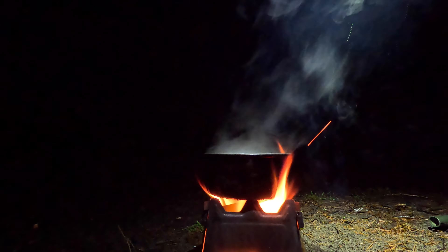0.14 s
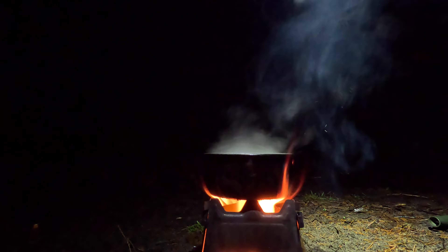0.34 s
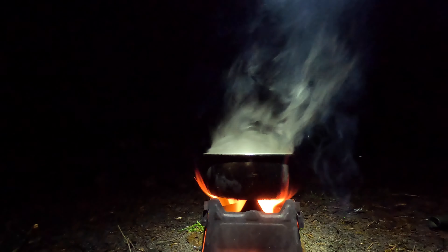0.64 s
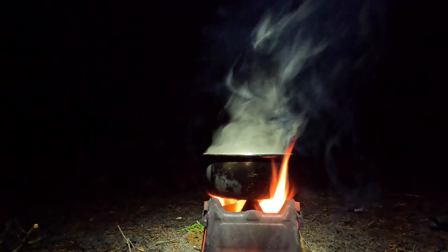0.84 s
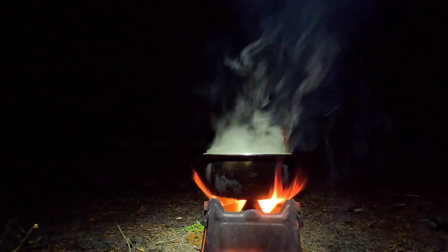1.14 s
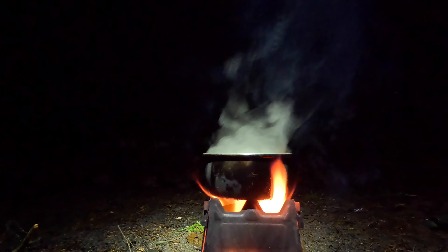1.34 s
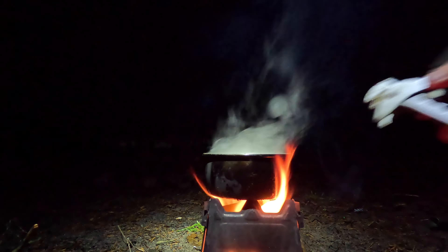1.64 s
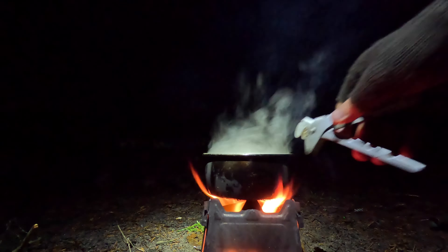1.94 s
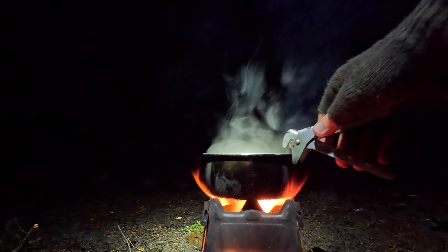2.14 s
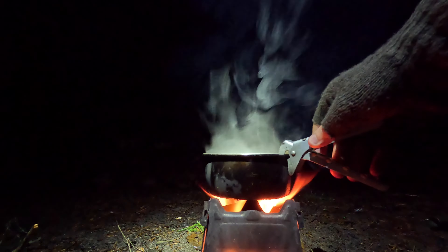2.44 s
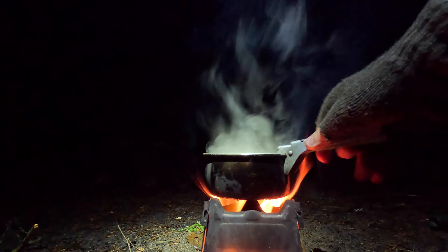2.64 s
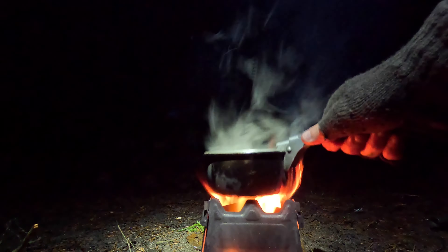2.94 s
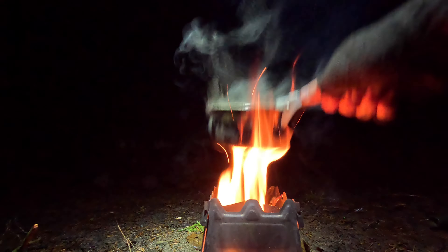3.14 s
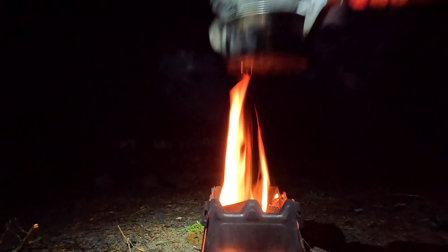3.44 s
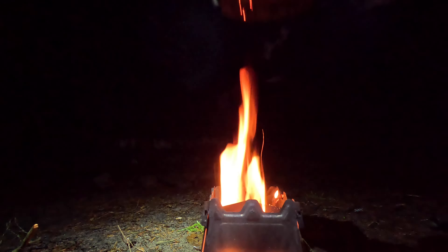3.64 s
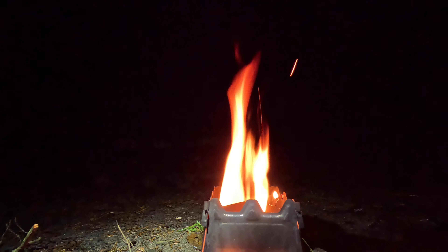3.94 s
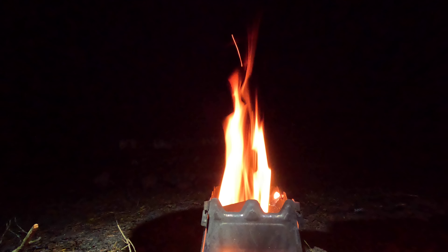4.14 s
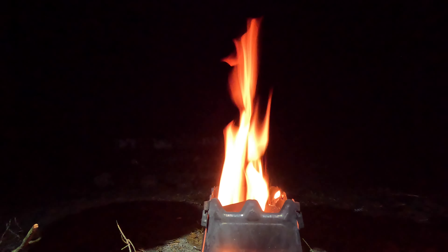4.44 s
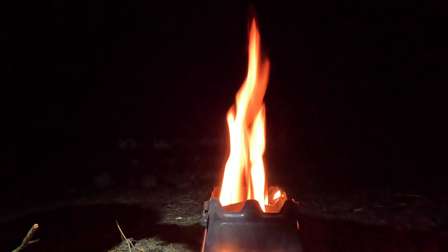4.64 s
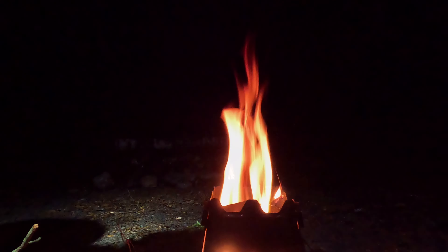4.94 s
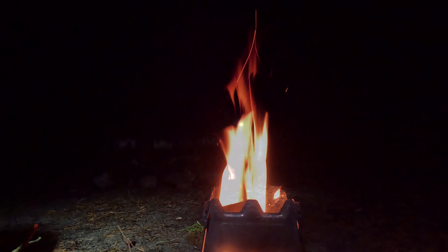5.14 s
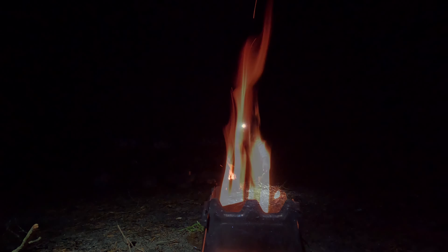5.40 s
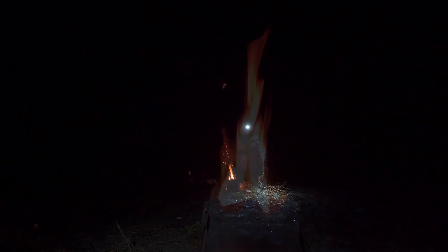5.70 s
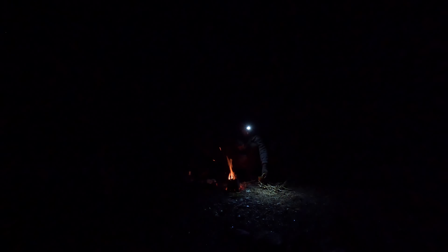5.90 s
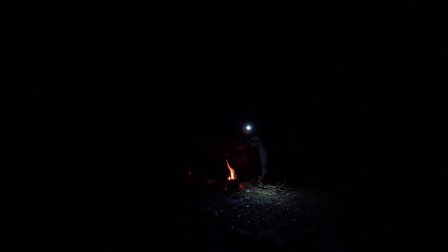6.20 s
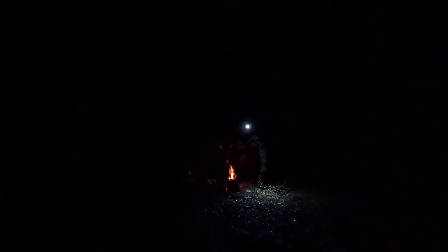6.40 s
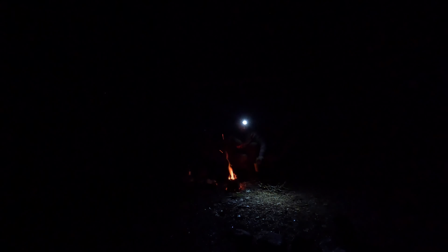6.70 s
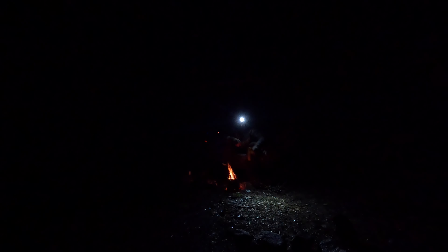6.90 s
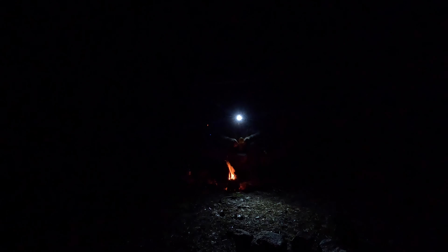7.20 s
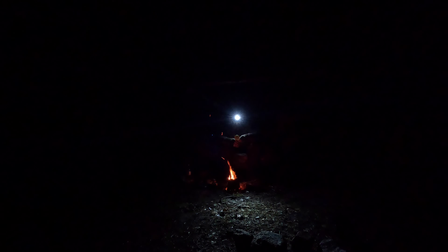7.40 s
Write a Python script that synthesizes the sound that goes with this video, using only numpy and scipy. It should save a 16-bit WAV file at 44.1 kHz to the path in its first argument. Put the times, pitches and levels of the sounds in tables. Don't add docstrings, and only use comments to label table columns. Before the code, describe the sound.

Close beside a small wood fire under a tarp, a light pot scrapes, rings briefly and lands with a dull clunk. Single drops tick and thump the sheet at irregular intervals. A hard bright clank and a dry metal snap follow as a gripper takes the pot, then small crackles thicken around the flame. The last part is the same drizzle and fire heard from farther off, quieter and less bright.

```python
import sys
import numpy as np
from scipy import signal
from scipy.io import wavfile
from scipy.ndimage import uniform_filter1d

SR = 44100
rng = np.random.default_rng(int(sys.argv[2]) if len(sys.argv) > 2 else 0)


def file_out(sig):
    cols = np.atleast_2d(sig).T
    lim = np.clip(cols, -1, 1)
    pcm = np.round(lim * 32767).astype(np.int16)
    wavfile.write(sys.argv[1], SR, pcm)


def field_ratio(decibels):
    return 10 ** (np.asarray(decibels, dtype=float) / 20)


N = 333376
T = np.arange(N) / SR

LIFT_S, AWAY_S = (2.39, 3.68), (5.06, 5.59)
LIFTED, AWAY = np.interp(T, LIFT_S, [0, 1]), np.interp(T, AWAY_S, [0, 1])

POT_HZ = [666, 1168, 1340, 1978, 2584, 2692, 2918, 3556, 4000, 4432, 5339, 5556, 6056, 6708]
# (level [dB], t60 [s])
POT_FREE = [(-9, .53), (-8, .65), (-14, .41), (-25, .47), (-9, .46), (-19, .24), (-14, .26), (-3, .19),
            (-13, .09), (-14, .2), (-13, .15), (-16, .13), (-13, .094), (-22, .11)]
# (mode [Hz], level [dB], t60 [s])
POT_DOWN = [(668, 0, .12), (1163, -19, .25), (1809, -24, .45), (1981, -19, .5), (2584, -24, .47),
            (2961, -17, .41), (4436, -27, .29), (5329, -32, .4)]
# (mode [Hz], level [dB], t60 [s])
EDGE = [(1380, 0.5, 0.1), (2500, -15, 0.044), (2900, -17, 0.043), (3590, 4, 0.03), (4580, 0, 0.062),
        (5000, -27, .03), (5600, -0.5, 0.025), (6050, -7, 0.025)]
# (hardest at [s], grating [dB], swell [dB/s], fade [dB/s])
STROKES = [
    (.292, -56, 3200, 138),
    (0.331, -51, 228, 1296),
    (0.43, -37, 780, 900),
    (0.472, -30.5, 903, 800),
    (.49, -50, 304, 900),
]
# (time [s], level [dB], hard contact share [0-1])
CATCHES = [
    (.288, -43.5, 0.54),
    (.303, -39, 0),
    (.327, -51, .9),
    (.411, -40.5, 0.1),
    (.427, -53, 0.5),
    (.44, -31, 0.26),
    (.452, -35, 0.15),
    (.464, -48, 1),
    (.482, -47, 1),
]
# (time [s], level [dB])
SET_DOWN = [
    (.575, -29.5),
    (.62, -47),
    (.66, -56),
    (.715, -67),
]
LET_GO = [(.469, -33)]
GRATING_T60_S, CAUGHT_S, SETTLED_S = 0.26, .572, 0.665
DENT_RATIO, DENT_DB = 1.008, -11

# (mode [Hz], level [dB], t60 [s])
RIM = [(320, -8, .12), (678, -21, .25), (1055, -13, .14), (1233, 0, .072), (2216, -3, .15),
       (2654, -23, .19), (3185, -6, .15), (4064, -7, .13), (4511, -20, .13), (4867, -20, .2),
       (5010, 4, .022), (5604, -19, .22), (6342, -11, .08), (7106, -26, .13)]
# (mode [Hz], level [dB], t60 [s])
RIM_LIGHT = [(349, -6.5, 0.19), (1600, 6, .04), (2130, -5, 0.17), (3180, 5, 0.058), (4064, -10, .12),
             (4480, 1, .025), (5600, -7, 0.16)]
# (mode [Hz], level [dB], t60 [s])
JAWS_OPEN = [(1530, 4, 0.018), (3220, 0, 0.026), (4200, -7, 0.017), (5670, -4, .05)]
# (mode [Hz], level [dB], t60 [s])
JAWS_SHUT = [(386, -17.5, 0.16), (1700, -24, 0.037), (2467, -1.5, 0.031), (3350, 1, 0.027),
             (4210, 4.5, 0.023), (4950, -1.5, 0.049), (5750, -8, 0.061), (6600, -29, 0.022)]
# (time [s], level [dB])
RIM_HITS = [(2.326, -30), (2.333, -52), (2.342, -69), (2.355, -66), (2.37, -73)]
LIGHT_HITS = [(2.461, -44.5), (2.475, -56)]
# (time [s], level [dB])
BRUSHES = [
    (2.672, -43),
    (2.676, -51),
    (2.681, -60),
]
# (time [s], level [dB])
JAW_HITS = [
    (2.695, -40.5),
    (2.6962, -25.5),
    (2.705, -41.5),
]
# (time [s], peak [dB], centre [Hz], t60 [s])
CLICKS = [(0.2867, -40, 2410, 0.04), (0.3078, -31, 4400, 0.043), (0.427, -45, 3620, 0.026),
          (0.4638, -16.5, 3650, 0.044), (0.5735, -38, 2940, 0.015), (2.3259, -10, 6450, 0.012),
          (2.4612, -35, 4480, 0.011), (2.672, -42, 3230, 0.02), (2.6949, -19.5, 4200, 0.024),
          (.435, -35, 5200, .02), (.483, -35, 4800, .02)]
# (time [s], peak [dB], centre [Hz], t60 [s])
KNOCKS = [(.289, -34.5, 1180, 0.039), (0.327, -33.5, 1120, 0.095), (0.426, -36, 1210, 0.024),
          (.45, -37, 1240, 0.024), (.575, -28, 660, 0.028), (0.611, -39.5, 814, 0.15),
          (2.3255, -19, 1460, 0.043), (2.459, -39.5, 1470, 0.11), (2.696, -31, 1700, 0.039),
          (.001, -42, 645, 0.12), (.66, -39, 1250, 0.095)]
POT_LEAN_DB, GRIPPER_LEAN_DB = -3, -6

# (time [s], peak [dB], centre [Hz], L-R [dB])
TICKS = [(.3546, -9.5, 6400, -5), (1.915, -29.5, 7300, -5.5), (2.209, -34, 5400, 1),
         (2.2338, -12.5, 6600, -4), (2.3144, -20.5, 5600, -2), (2.8536, -25.5, 6450, 2),
         (2.9653, -11.5, 6230, 1), (3.0688, -29, 9100, -3), (3.356, -28.5, 6850, -2.5),
         (3.7329, -42, 7150, 5), (3.8016, -43, 7710, 4), (3.8856, -36.5, 7200, -2),
         (4.1737, -31.5, 8300, 3), (4.3883, -10, 8330, 3), (4.581, -32.5, 7400, -2.5),
         (4.9746, -34, 7040, 10)]
# (time [s], peak [dB], centre [Hz], L-R [dB])
TAPS = [(.0647, -38, 2890, -11), (.0817, -17, 7550, 2), (.7459, -32, 3740, -7), (1.506, -16.5, 3850, 4),
        (2.0073, -24, 2870, 5), (2.0586, -36, 2550, -1), (2.0908, -37.5, 3760, -3), (2.2906, -28, 3130, 5),
        (2.4335, -33.5, 5500, 2), (2.778, -40, 4140, 13), (3.1826, -32.5, 3300, 6),
        (3.312, -34.5, 3040, -3), (3.3278, -33.5, 2980, 3), (3.8492, -38.5, 2900, 3),
        (4.5487, -39, 3820, 2), (5.1447, -39, 3000, 10), (5.2697, -36.5, 3970, 0)]
# (time [s], peak [dB], centre [Hz], t60 [s], L-R [dB])
FAR_DROPS = [(5.4158, -40, 2620, 0.0069, -6), (5.452, -37, 6800, 0.085, 4), (5.572, -30.5, 8700, 0.014, -3),
             (5.614, -35.5, 6740, 0.033, -2), (5.707, -28, 3180, 0.0068, -3),
             (6.035, -35.5, 7700, 0.029, -4), (6.199, -48, 9600, 0.048, 17), (6.2243, -26, 8400, 0.02, 0.5),
             (6.2503, -38, 3500, 0.017, -5), (6.2966, -40, 8500, 0.05, 1), (6.497, -35, 5800, 0.016, -3),
             (6.738, -21, 6140, 0.021, 1), (7.2753, -39.5, 8200, 0.095, -3)]
# (time [s], peak [dB], centre [Hz])
FAINT = [(1.418, -38, 3180), (3.4042, -42, 6000), (4.3337, -41, 6900), (5.021, -41.5, 3900),
         (5.3226, -42, 4670), (5.893, -41.5, 7000), (6.96, -43.5, 5400), (1.993, -42, 2500)]
# (time [s], peak [dB], centre [Hz], t60 [s])
SLAPS = [(.082, -40, 1600, 0.016), (0.093, -41.5, 680, 0.072), (0.205, -40.5, 1490, 0.066),
         (.355, -26.5, 685, 0.012), (1.5056, -17.5, 1150, 0.029), (2.0075, -23.5, 1180, 0.039),
         (2.234, -27.5, 2180, 0.018), (2.2562, -28, 1350, 0.059), (2.291, -21.5, 1000, 0.027),
         (2.619, -42, 1900, 0.046), (2.776, -35.5, 1150, 0.038), (2.9655, -25, 2150, 0.0046),
         (3.184, -20.5, 1220, 0.022), (3.328, -40.5, 1140, 0.018), (3.662, -33.5, 2180, 0.014),
         (3.794, -39, 1160, 0.027), (5.416, -28, 1430, 0.018), (5.596, -33.5, 960, 0.044),
         (5.706, -35.5, 1660, 0.014), (6.035, -38, 1210, 0.034), (6.223, -32.5, 1290, 0.018),
         (6.25, -38, 1400, 0.065), (6.497, -33.5, 790, 0.042), (6.642, -36, 810, 0.026),
         (6.739, -32, 720, 0.033), (6.7525, -35.5, 1040, 0.064), (6.912, -43, 1200, 0.073)]
# (time [s], peak [dB], centre [Hz], L-R [dB])
PATS = [(3.432, -53, 1990, -0.5), (3.54, -50, 1130, 0.0), (3.609, -46, 2100, 1), (3.755, -45, 1170, -1),
        (3.923, -48, 1310, 3), (3.956, -47, 1390, 3), (4.029, -45.5, 1120, 2), (4.061, -49, 2120, -0.5),
        (4.111, -50, 1310, 2), (4.14, -57, 1280, 8), (4.333, -47.5, 990, 1), (4.388, -27.5, 2750, -4.5),
        (4.488, -51, 1110, 12), (4.546, -42.5, 1990, 11), (4.578, -51, 1330, 14), (4.634, -45, 1960, 13),
        (4.741, -53, 1570, 17), (4.969, -40, 3230, 3.0), (4.987, -44, 1320, 2), (5.021, -57, 1150, 8),
        (5.047, -47, 1270, 7), (5.085, -46, 2280, 2.0), (5.123, -48, 2300, 13), (5.143, -45, 1390, 1),
        (5.434, -50, 1100, 0.0), (5.466, -48, 1310, -2), (5.744, -57, 1380, 0.0), (5.859, -54.5, 1010, -1),
        (5.89, -49.5, 2590, 1.5), (5.973, -64, 1050, -2), (6.144, -54, 977, -5), (6.2, -55, 1350, 4),
        (6.297, -51.5, 1330, 5), (6.352, -54, 1300, 0), (6.595, -49, 1080, -2), (6.953, -50, 1220, 0.5),
        (7.026, -48.5, 1300, -1), (7.058, -56.5, 1230, -7), (7.273, -48.5, 1400, 2),
        (7.406, -55, 1710, 0.5)]
# (time [s], peak [dB], centre [Hz], t60 [s])
SPLATS = [(2.404, -53, 5000, .01), (5.5958, -37, 2260, 0.022), (5.6016, -36.5, 1880, .035),
          (5.821, -58, 4530, 0.009), (5.975, -52, 6950, .015), (6.228, -33.5, 3050, 0.039),
          (6.2499, -35, 3130, .03), (6.267, -49, 3200, .015), (6.4971, -36, 3000, 0.016),
          (6.504, -49, 2970, 0.013), (6.542, -49, 5900, .02), (6.9113, -38.5, 2700, 0.024),
          (6.917, -43, 1400, 0.036), (5.327, -46.5, 3600, .015), (5.358, -47, 1300, .012),
          (5.5748, -41.5, 7000, .02), (5.7052, -54, 8100, 0.0045), (6.7525, -38, 2500, .05)]
# (time [s], peak [dB], swing [Hz])
THUDS = [(.001, -46.5, 616), (.093, -44.5, 420), (0.136, -46, 400), (0.223, -44.5, 195), (2.221, -41, 200),
         (0.326, -40.5, 148), (0.611, -33.5, 442), (0.654, -42.5, 168), (1.157, -41.5, 88.5),
         (1.505, -24, 274), (1.631, -40.5, 59.5), (2.009, -30, 297), (2.249, -35, 298), (2.2578, -28, 260),
         (2.266, -38, 248), (2.291, -33.5, 335), (2.328, -39, 306), (2.462, -40.5, 370),
         (2.775, -31.5, 195), (3.1839, -26, 275), (3.462, -37.5, 128), (5.271, -39.5, 73.5),
         (5.277, -31, 223), (5.417, -41.5, 300), (5.708, -43.5, 317), (6.7383, -32, 342),
         (2.788, -32.5, 342), (2.83, -51, 330), (6.502, -44.5, 144), (6.759, -41.5, 302)]
# (time [s], delay [ms], low-mid hollowness [0-1])
BOUNCES = [(.082, .235, 0), (.746, .78, 0), (1.506, 1.0, .9), (1.915, .14, 0), (2.007, .66, .8),
           (2.234, .28, 0), (2.257, .8, .5), (2.291, .94, .15), (2.326, .46, 0), (2.696, 1.2, 1),
           (2.854, .33, 0), (2.966, .27, 0), (3.183, 1.04, .7), (3.356, .32, 0), (3.662, .96, .8),
           (4.388, .12, 0), (5.416, .8, .9), (5.707, .84, 0), (6.034, .2, 0), (6.224, .42, 0)]
TICK_CYCLES, TAP_CYCLES, PAT_CYCLES = 35, 18, 23
LONGER_PER_DB = 0.23
SLAP_LEAN = 0.3
BOUNCE_SHARE, BOUNCE_SHARP_DB = .62, 5
DRIP_S, DRIP_DB, DRIP_HZ, DRIP_FALL_PER_S, DRIP_T60_S = 0.19, -44, 1400, 28, 0.065

# (frequency [Hz], density [dB/Hz])
FLUTTER_NEAR = [(12, -35), (20, -5.5), (64, 2), (107, -12), (151, 5), (219, -1.5), (282, -0.5),
                (435, -10.5), (700, -37), (910, -51), (1540, -120)]
# (frequency [Hz], density [dB/Hz])
FLUTTER_FAR = [(12, -38), (20, -2), (86, -9), (117, -28), (151, 3.5), (204, 0.5), (229, -8), (266, -22),
               (282, -14), (560, -24), (700, -41), (910, -62), (1540, -120)]
# (frequency [Hz], density [dB/Hz])
SIMMER = [(500, -14), (631, -5), (1180, 9), (1690, 1), (2190, 10.5), (2850, 0), (3600, 4), (4940, -6.5),
          (5550, 4), (6400, -2.5), (7500, 0.5), (8200, -3), (9400, 2.5), (10500, -14), (14500, -13)]
# (frequency [Hz], density [dB/Hz])
FLAME = [(500, -6), (668, -15), (1230, 3), (1690, -3), (2230, -1), (5700, -8.5), (9500, -9), (10500, -17.5),
         (14500, -25.5)]
# (frequency [Hz], density [dB/Hz])
FOREST = [(500, 7), (795, -10), (1280, -1.5), (2850, -8), (4150, -11.5), (7500, -14), (9600, -15),
          (10500, -29), (14500, -33)]
# (frequency [Hz], left-right likeness [0-1])
LIKENESS = [(60, 1), (100, 0.96), (180, 0.97), (310, 0.61), (550, 0.88), (950, 0.88), (1650, 0.82),
            (2860, 0.59), (4970, 0.91), (8640, 1), (15000, 0.12)]
# (frequency [Hz], left-right likeness [0-1])
LIKENESS_FAR = [(60, 1), (150, 0.27), (380, 0.65), (950, 0.62), (2380, 0.35), (5980, 0.91), (15000, 0.96)]
# (frequency [Hz], L-R [dB])
LEAN_FAR = [(60, -1.5), (180, -7.5), (550, -2.5), (1650, 1.5), (4970, -0.5), (15000, 5.5)]
# (time [s], level [dB])
VIGOUR = [(0, 1), (.31, 2), (.6, 1), (1.01, 1.5), (1.96, 1.5), (2.23, 2.5), (2.95, 3.5), (3.26, 0.5),
          (3.64, 1), (4.19, -2.5), (4.42, -1.5), (4.74, 2), (5.07, 0), (5.73, -1), (6.5, -3), (6.69, 0),
          (7.07, -1), (7.56, -1)]
# (time [s], width [s], level [dB])
SWELLS = [
    (4.88, 0.08, 4),
    (5.21, 0.067, 6),
]
# (pot on [dB], pot lifted [dB], from afar [dB], share of vigour followed [ratio])
FLUTTER, HISS, DRIZZLE = (-68.5, -62.5, -65.5, 0.92), (-64.5, -64, -71, 1.4), (-68, -67, -74.5, 0.6)
CALM_FAR = 0.74


def rms_one(x):
    return x / np.sqrt(np.mean(x ** 2) + 1e-20)


def at_hz(points, hz):
    points_hz, values = np.transpose(points)
    return np.interp(np.log(hz), np.log(points_hz), values)


def band(x, low_hz, high_hz):
    sos = signal.butter(2, [low_hz, min(high_hz, .45 * SR)], "band", fs=SR, output="sos")
    return signal.sosfilt(sos, x)


def low_pass(x, order, cutoff_hz):
    return signal.sosfilt(signal.butter(order, cutoff_hz, fs=SR, output="sos"), x)


def add(out, s, sound):
    i = round(s * SR)
    out[:, i:i + sound.shape[1]] += sound[:, :N - i]


def blows(hits):
    clicks = np.zeros(N)
    clicks[[round(s * SR) for s, db in hits]] = field_ratio(np.array(hits)[:, 1])
    return clicks


def struck(clicks, modes):
    first, last = np.flatnonzero(clicks)[[0, -1]]
    ringing = slice(first, last + SR // 2)
    force, out = clicks[ringing] + 1e-18, np.zeros(N)
    for hz, level_db, t60_s in modes:
        r, w = field_ratio(-60 / (t60_s * SR)), 2 * np.pi * hz / SR
        out[ringing] += field_ratio(level_db) * signal.lfilter([0, np.sin(w)], [1, -2 * r * np.cos(w), r * r], force)
    return out


def pot():
    pressure_db = np.max([db - np.maximum(swell * (s - T), fade * (T - s))
                          for s, db, swell, fade in STROKES], axis=0)
    grit = field_ratio(1.7 * np.minimum(rng.exponential(1, N), 4)) * rng.choice([-1, 1], N)
    grit *= rng.random(N) < 1500 / SR
    grit *= field_ratio(pressure_db) * (pressure_db > -90)

    hard = blows([(s, db + 20 * np.log10(np.clip(share, .01, 1))) for s, db, share in CATCHES])
    soft = band(blows([row[:2] for row in CATCHES]), 500, 1200)
    damped = [(hz, db, min(t60_s, GRATING_T60_S)) for hz, (db, t60_s) in zip(POT_HZ, POT_FREE)]
    rubbing = struck(field_ratio(-24.0) * grit + hard + soft, damped)
    scrape = field_ratio(11.0) * band(grit, 1400, 3800)
    edge = field_ratio(-16.5) * struck(grit, EDGE)

    modes = np.c_[POT_HZ, POT_FREE]
    twins = modes * [DENT_RATIO, 1, 1] + [0, DENT_DB, 0]
    free = struck(blows(LET_GO), np.r_[modes, twins])
    free *= field_ratio(-2500 * np.maximum(T - CAUGHT_S, 0))
    down = struck(blows(SET_DOWN), POT_DOWN) * field_ratio(-400 * np.maximum(T - SETTLED_S, 0))
    return rubbing + free + scrape + edge + down


def gripper():
    contacts = [(RIM_HITS, RIM), (LIGHT_HITS, RIM_LIGHT), (BRUSHES, JAWS_OPEN), (JAW_HITS, JAWS_SHUT)]
    return sum(struck(blows(hits), modes) for hits, modes in contacts)


def leaning(contacts):
    return [(*row, POT_LEAN_DB if row[0] < 1 else GRIPPER_LEAN_DB) for row in contacts]


def taps(table, low_hz, high_hz, sharp_db, turns, peak_db, spread):
    out, t = np.zeros((2, N)), np.arange(3000) / SR
    splash = rng.standard_normal((len(table), 2, len(t)))
    for (s, db, hz, t60_s, pan_db), (mid, side) in zip(table, splash):
        t60_s = np.clip(t60_s, .003, .12)
        noise = mid + spread * side * np.array([[1], [-1]])
        push = noise * field_ratio(-60 * t / t60_s)
        tail = noise[:, ::-1] * field_ratio(-15.5 - 60 * t / (4.6 * t60_s))
        returns = ((ms / 1000, share) for at, ms, share in BOUNCES if abs(at - s) < .003)
        delay_s, hollow = next(returns, (0, 0))
        push[:, 0] += field_ratio(sharp_db + BOUNCE_SHARP_DB * (delay_s > 0))
        if delay_s:
            order = np.arange(3)
            push = signal.lfilter(np.bincount(order * round(delay_s * SR), BOUNCE_SHARE ** order), 1, push)
            tail = tail * 1.1
        push = push + tail
        resonance = band(push, hz * (1 - 1 / turns), hz * (1 + 1 / turns))
        sound = band(push, low_hz, high_hz) + field_ratio(peak_db) * resonance
        if delay_s:
            sound = sound - hollow * band(sound, 385, 860)
        lags_s = [2e-5, 2e-5 + 4e-6 * np.clip(pan_db, -4, 4)]
        heard = np.array([np.interp(t - lag, t, ear, left=0) for ear, lag in zip(sound, lags_s)])
        level = field_ratio(db) / np.abs(sound.mean(axis=0)).max()
        add(out, s, level * heard * field_ratio([[pan_db / 2], [-pan_db / 2]]))
    return out


def drops():
    near = [(s, db, hz, cycles * (1.5 - LONGER_PER_DB * (db + 26)) / hz, pan_db)
            for table, cycles in [(TICKS, TICK_CYCLES), (TAPS, TAP_CYCLES)] for s, db, hz, pan_db in table]
    faint = [(s, db, hz, 2 * TICK_CYCLES / hz, 0) for s, db, hz in FAINT]
    cracks = sorted(near + FAR_DROPS)
    crack_s, *_, lean_db = np.transpose(cracks)
    slaps = []
    for s, *rest in SLAPS:
        nearest_s = min(crack_s, key=lambda at: abs(at - s))
        start_s = nearest_s if abs(nearest_s - s) < .003 else s
        slaps.append((start_s, *rest, SLAP_LEAN * np.interp(s, crack_s, lean_db)))
    pats = [(s, db, hz, PAT_CYCLES / hz, pan_db) for s, db, hz, pan_db in PATS]

    sheet = taps(cracks + leaning(CLICKS) + faint, 2900, 8030, sharp_db=17.0, turns=3.4, peak_db=0.0, spread=0.64)
    sheet -= taps(slaps + leaning(KNOCKS), 260, 2780, sharp_db=13, turns=6.3, peak_db=3.0, spread=0.27)
    sheet += taps(pats, 410, 4600, sharp_db=11.0, turns=4.9, peak_db=12.0, spread=0.36)
    echo = round(.0031 * SR)
    sheet[:, echo:] += field_ratio(-21) * sheet[:, :-echo]
    return sheet


def splats():
    rows = [(*row, -1.5) for row in SPLATS]
    return taps(rows, 610, 5200, sharp_db=-1.0, turns=5.7, peak_db=1.0, spread=0.35)


def thuds():
    out, t = np.zeros((2, N)), np.arange(4000) / SR
    for s, db, hz in THUDS:
        swing = np.sin(2 * np.pi * hz * t) * (hz * t) ** 0.5 * np.exp(-2.4 * hz * t)
        add(out, s, field_ratio(db) * swing / np.abs(swing).max() * np.ones((2, 1)))
    return out


def drip():
    t = np.maximum(T - DRIP_S, 0)
    cycles = DRIP_HZ * (1 - np.exp(-DRIP_FALL_PER_S * t)) / DRIP_FALL_PER_S
    return field_ratio(DRIP_DB - 60 * np.minimum(t, 1) / DRIP_T60_S) * np.sin(2 * np.pi * cycles)


def patter():
    per_s = 70 + 300 * (LIFTED - AWAY)
    sizes = field_ratio(5.0 * np.minimum(rng.exponential(1, N), 3.7)) * (rng.random(N) < per_s / SR)
    pitch, out = rng.integers(0, 12, N), 0
    for k, hz in enumerate(np.geomspace(350, 9500, 12)):
        tick = struck(sizes * (pitch == k), [(hz, 2.2 * np.log2(hz / 2000), 0.75 / hz)])
        out = out + tick * field_ratio(rng.normal(0, 6.5) * np.array([[1], [-1]]))
    return field_ratio(-55.5 - 10.5 * AWAY) * out


def drift(rate_hz):
    r = np.exp(-80 * np.pi * rate_hz / SR)
    slow = signal.lfilter([1], [1, -2 * r, r * r], rng.standard_normal(N // 40 + 2002))[2000:]
    return np.interp(np.arange(N) / 40, np.arange(len(slow)), rms_one(slow))


def noise_bank(spectra, shares, low_hz, high_hz, count, patchy_db, grainy_db, gusts_per_s):
    grains = field_ratio(grainy_db * np.minimum(rng.exponential(1, N), 6)) * rng.choice([-1, 1], N)
    white = rng.standard_normal((2, 2, N)) * rms_one(uniform_filter1d(np.abs(grains), size=20))
    edges = np.geomspace(low_hz, high_hz, count + 1)
    centres = np.sqrt(edges[1:] * edges[:-1])
    power = [np.sum(field_ratio(at_hz(s, centres)) ** 2 * np.diff(edges)) for s in spectra]
    left, right, together, away = 0, 0, drift(gusts_per_s), shares[-1]
    for k, (low, high, hz) in enumerate(zip(edges, edges[1:], centres)):
        mid, side = band(white[k % 2], low, high)
        alike = np.clip((1 - away) * at_hz(LIKENESS, hz) + away * at_hz(LIKENESS_FAR, hz), -1, 1)
        level = sum(share * field_ratio(at_hz(s, hz)) / np.sqrt(p) for s, share, p in zip(spectra, shares, power))
        gain = level * field_ratio(patchy_db * (1 - CALM_FAR * away) * (together + drift(20.0)))
        mid = gain * np.sqrt(1 + alike) * mid
        side = gain * np.sqrt(1 - alike) * side
        lean = 1 + away * (field_ratio(at_hz(LEAN_FAR, hz) / 2) - 1)
        left = left + (mid + side) * lean
        right = right + (mid - side) / lean
    return np.array([left, right]) * np.sqrt(SR / 2)


def bed():
    vigour_db = np.interp(T, *np.transpose(VIGOUR))
    colours, shares = [SIMMER, FLAME, FOREST], [1 - LIFTED, LIFTED - AWAY, AWAY]
    flutter_db, hiss_db, rain_db = [np.dot(row[:-1], shares) + row[-1] * vigour_db
                                    for row in (FLUTTER, HISS, DRIZZLE)]
    flutter = noise_bank([FLUTTER_NEAR, FLUTTER_FAR], [1 - AWAY, AWAY], 21.2, 639, count=15,
                         patchy_db=2.5, grainy_db=3.5, gusts_per_s=17.4)
    hiss = noise_bank(colours, shares, 612, 4590, count=10, patchy_db=0.34, grainy_db=6.0, gusts_per_s=0.55)
    rain = noise_bank(colours, shares, 4880, 16100, count=12, patchy_db=1.0, grainy_db=6.0, gusts_per_s=0.33)
    swell_db = sum(db * np.exp(-((T - s) / width_s) ** 2) for s, width_s, db in SWELLS)
    return field_ratio(flutter_db) * flutter + field_ratio(swell_db) * (field_ratio(hiss_db) * hiss + field_ratio(rain_db) * rain)


def ports(x):
    mid, side = (x[0] + x[1]) / 2, (x[0] - x[1]) / 2
    side = side - 0.69 * band(side, 3900, 14600)
    both = np.array([mid + side, mid - side]) + 0.82 * band(mid, 8940, 9600)
    treble = band(x, 11100, 16300) + field_ratio(-12.0) * band(x, 14200, 15000)
    return low_pass(both, 6, 10300) + field_ratio(np.array([[-4], [-10]])) * treble


def scene():
    metal = pot() * field_ratio([[-1.5], [1.5]]) + gripper() * field_ratio([[-1.2], [1.2]])
    close = metal + drops() + splats() + drip() + patter()
    return ports(close) + band(thuds(), 93, 1700) + bed()


def top_cut(x):
    return signal.sosfilt(signal.butter(12, 16530, fs=SR, output="sos"), x)


def record(dry):
    mix = low_pass(dry, 2, 14500)
    return top_cut(mix)


dry = scene()
out = record(dry)
file_out(out)
```